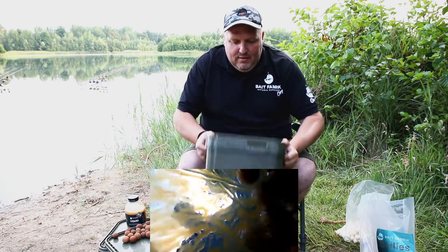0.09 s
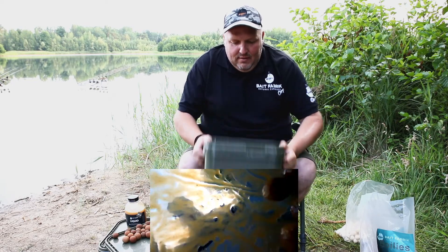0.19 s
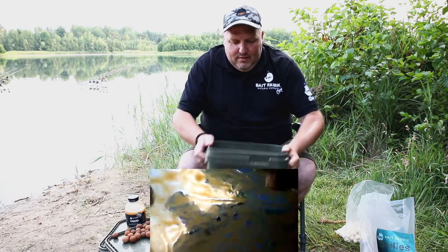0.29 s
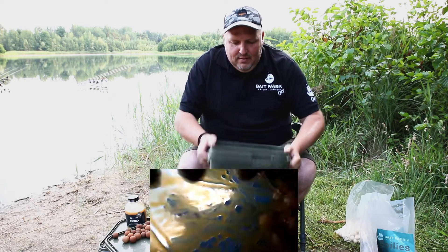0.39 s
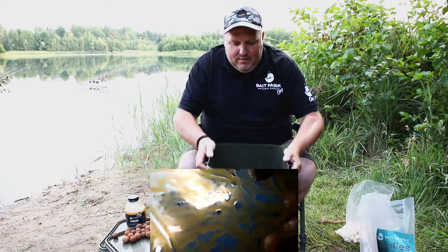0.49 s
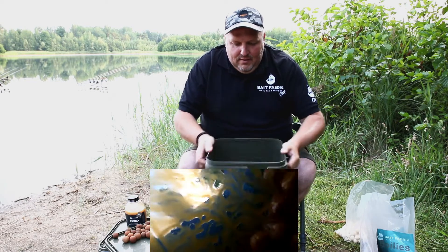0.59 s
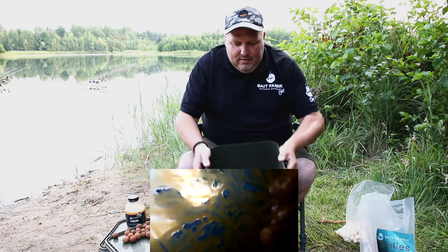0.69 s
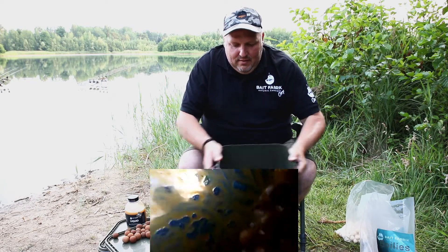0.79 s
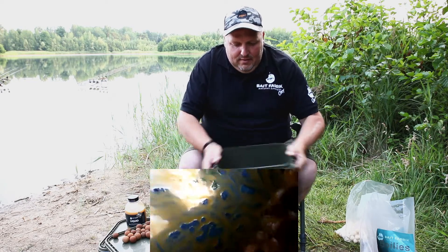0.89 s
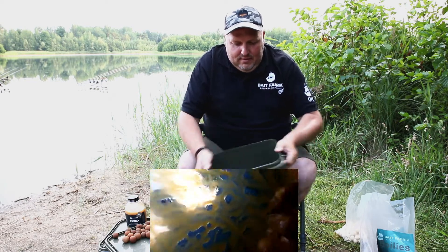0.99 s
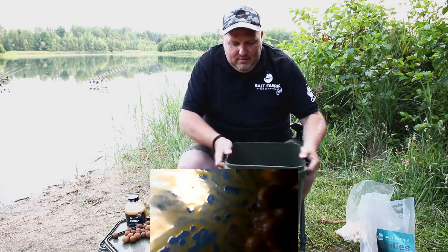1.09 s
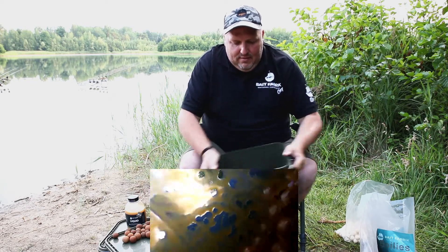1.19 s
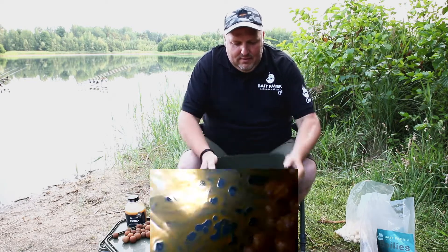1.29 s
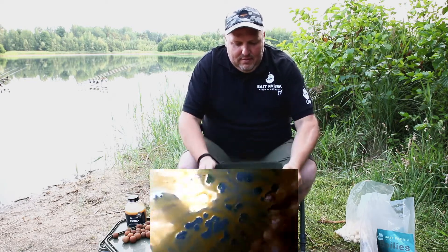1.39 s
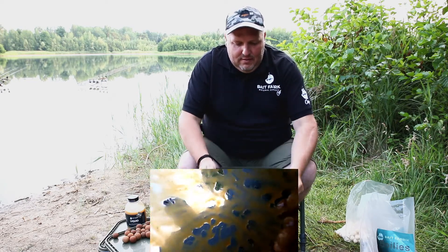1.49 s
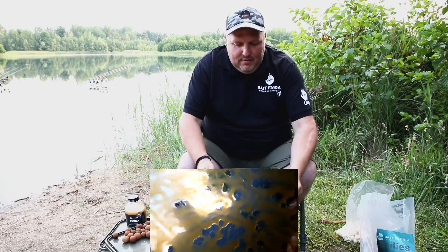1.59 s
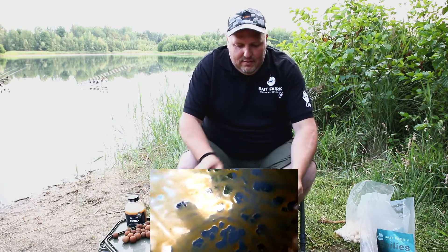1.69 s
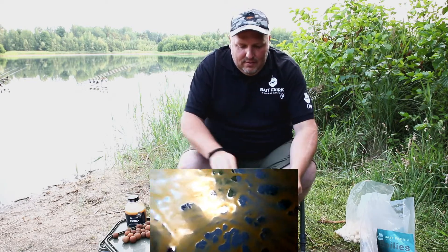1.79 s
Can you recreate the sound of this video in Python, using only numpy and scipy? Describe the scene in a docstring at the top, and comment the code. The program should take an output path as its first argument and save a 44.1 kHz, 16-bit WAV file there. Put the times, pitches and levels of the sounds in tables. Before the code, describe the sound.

Close, dry outdoor sound of a plastic tub tilted by hand: baits clatter hollowly twice, thin to single knocks, the rim clacks, more knocks tumble, then a dull thud and brief handling scuff.

```python
"""Hard baits rolling in a plastic tub

Outdoors, one microphone close to the tub, no echo; the air behind is very quiet, with a faint whine.
Round baits roll from side to side: two dense surges of small impacts, then knocks in ones and twos.
The stiff rim clacks in the hands, the tub is put down with a thud and handled once more.
Hits are sums of damped modes and short noise bursts; sliding, sleeves and air are coloured noise."""
import sys
import numpy as np
from scipy import signal
from scipy.fft import rfft, irfft
from scipy.io import wavfile
from scipy.ndimage import uniform_filter1d

SR = 44100
rng = np.random.default_rng(int(sys.argv[2]) if len(sys.argv) > 2 else 0)


def master_out(mix):
    """Clip the mix to full scale and print it as 16-bit PCM to the path in sys.argv[1]."""
    frames = np.transpose(np.atleast_2d(mix))
    ceiling = np.clip(frames, -1, 1)
    pcm = np.round(ceiling * 32767).astype(np.int16)
    wavfile.write(sys.argv[1], SR, pcm)


N = 79380
RING_S = 0.16  # length computed for each hit


def amp(db):
    """Decibels to gain."""
    return 10 ** (np.asarray(db) / 20)


def unit(hit):
    """Scale a hit so that its energy equals that of 10 ms at level 1."""
    return hit / np.sqrt(np.sum(hit ** 2) / (0.01 * SR))


def low_cut(x, hz):
    """Remove the bass below a corner."""
    return signal.sosfilt(signal.butter(2, hz, "high", fs=SR, output="sos"), x)


def noise(spectrum, size):
    """Noise of level 1, coloured by a spectrum drawn straight over log frequency."""
    hz, db = np.array(spectrum, float).T
    freqs = np.maximum(np.fft.rfftfreq(size, 1 / SR), 1)
    gain = amp(np.interp(np.log(freqs), np.log(hz), db))
    coloured = irfft(rfft(rng.standard_normal(size)) * gain, size)
    return coloured / coloured.std()


def decay(t60):
    """A fall of 60 dB in t60 seconds."""
    return np.exp(-np.log(1000) * np.arange(int(RING_S * SR)) / SR / t60)


SPOT_SCATTER_DB, SPOT_DETUNE = 2.5, 0.0085  # spread of mode level, and of pitch as a share of it


def ring(modes):
    """Damped modes; every strike spot weights and detunes them a little differently."""
    t = np.arange(int(RING_S * SR)) / SR
    total = np.zeros(len(t))
    for hz, db, t60 in modes:
        sign_draw, level_draw, pitch_draw = rng.standard_normal(3)
        gain = np.sign(sign_draw) * amp(db + SPOT_SCATTER_DB * level_draw)
        pitch_hz = hz * (1 + SPOT_DETUNE * pitch_draw)
        total += gain * np.sin(2 * np.pi * pitch_hz * t) * decay(t60)
    return unit(total)


def burst(spectrum, t60):
    """Many close modes that die together, as decaying noise."""
    return unit(noise(spectrum, int(RING_S * SR)) * decay(t60))


def add(out, start_s, hit):
    """Mix a hit in at its time."""
    i = max(int(start_s * SR), 0)
    out[i:i + len(hit)] += hit[:N - i]


# Still outdoor air behind the tub: freq_hz, level_db (relative, per Hz)
AIR_SPECTRUM = [(25, -23), (50, 2), (85, -3), (170, 4), (280, -9), (600, -21.5), (1800, -10), (4500, -25.5),
                (10500, -26.5), (15500, -28)]
AIR_DB, WHINE_HZ, WHINE_DB = -55.5, 9994, -76


def air():
    """Still outdoor air as coloured noise, with a faint steady-pitched whine that wavers in level."""
    waver = uniform_filter1d(rng.standard_normal(N), size=1500)
    waver_gain = amp(2 * waver / waver.std())  # 2 dB spread
    tone = np.sqrt(2) * np.sin(2 * np.pi * WHINE_HZ * np.arange(N) / SR)
    return amp(AIR_DB) * noise(AIR_SPECTRUM, N) + amp(WHINE_DB) * waver_gain * tone


def rub(strokes, spectrum, grain_db):
    """Grainy friction: coloured noise that swells and stops with each stroke."""
    t = np.arange(N) / SR
    level = np.zeros(N)
    for peak_s, rise_s, fall_s, db in strokes:
        level += amp(db) * np.interp(t, [peak_s - rise_s, peak_s, peak_s + fall_s], [0, 1, 0])
    grain = uniform_filter1d(rng.standard_normal(N), size=130)
    return level * amp(grain_db * grain / grain.std()) * noise(spectrum, N)


# Sleeves brushing as the arms move: peak_s, rise_s, fall_s, level_db
SLEEVE_STROKES = [(.93, 0.15, 0.14, -67), (1.10, 0.13, 0.21, -62.5), (1.47, 0.17, 0.13, -64.5),
                  (1.63, 0.015, 0.012, -59.5)]
# Colour of the cloth: freq_hz, level_db (relative, per Hz)
SLEEVE_SPECTRUM = [(1500, -11), (3500, -7), (6000, 1), (10500, 11), (15500, -5)]


def sleeves():
    """Sleeves brushing: bright friction with almost no grain."""
    return rub(SLEEVE_STROKES, SLEEVE_SPECTRUM, grain_db=0.5)


# Hands and the tub's underside sliding on each other and on the support:
# peak_s, rise_s, fall_s, level_db
SLIDE_STROKES = [(.905, 0.052, 0.068, -47.5), (1.085, 0.19, 0.14, -43), (1.522, 0.021, 0.048, -39.5),
                 (1.661, 0.055, 0.072, -44)]
# Colour of the sliding: freq_hz, level_db (relative, per Hz)
SLIDE_SPECTRUM = [(120, -2), (300, 13.5), (900, 3), (2500, -4), (4500, -20), (10000, -26), (15500, -42)]


def slides():
    """Sliding contact on the tub: low, grainy friction."""
    return rub(SLIDE_STROKES, SLIDE_SPECTRUM, grain_db=3.5)


# Modes of the whole loaded tub on its support: pitch_hz, level_db (relative), t60_s
BASE_MODES = [(122.7, -1, 0.079), (180, -1, 0.049), (232.8, 3.5, 0.087), (307, -4.5, 0.065)]
# The tub landing and settling: start_s, level_db
THUDS_AT = [(1.502, -23), (1.521, -26), (1.534, -27), (1.556, -33)]
BASE_LOW_HZ = 119  # the whole tub radiates little below this


def thuds():
    """The tub is put down and rocks to rest; each contact rings the loaded tub's low modes."""
    out = np.zeros(N)
    for start_s, db in THUDS_AT:
        add(out, start_s, amp(db) * unit(low_cut(ring(BASE_MODES), BASE_LOW_HZ)))
    return out


# Modes of the stiff rim: pitch_hz, level_db (relative), t60_s
RIM_MODES = [(565, 8, 0.016), (997, 5, 0.029), (1345, -2.5, 0.042), (1450, -3.5, 0.032), (1576, 3, 0.044),
             (1743, 0, 0.027), (2312, -5.5, 0.044), (2446, 0, 0.029), (2835, -6.5, 0.035),
             (3262, -9, 0.033), (4550, -11.5, 0.028), (10660, -16, 0.021)]
# Crack of a hard contact: freq_hz, level_db (relative, per Hz)
CRACK_SPECTRUM = [(300, -21.5), (1500, 7), (2800, 5.5), (4500, -8.5), (7000, -11.5), (10500, -8.5),
                  (12500, -19.5), (15500, -53)]
# Sharp plastic clacks: start_s, ring_level_db, lead_pitch_hz, crack_level_db (before the build-up)
CLACKS_AT = [(.103, -39, 1511, -51), (.134, -50, 1980, -50.5), (0.276, -33.5, 1450, -45),
             (.297, -42, 2340, -48), (0.315, -31, 1670, -42), (0.471, -36, 2333, -50),
             (0.493, -41, 1500, -50), (.504, -33, 1450, -54), (0.545, -49, 2340, -50),
             (.578, -32.5, 1025, -72), (.587, -35.5, 2320, -38.5), (.644, -42, 1497, -53),
             (0.708, -44, 1600, -48.5), (.727, -41, 1574, -48), (.840, -48, 1664, -47.5),
             (.917, -32.5, 1406, -41), (0.918, -37, 3340, -64), (.977, -31.5, 1470, -53),
             (1, -44, 2200, -45), (1.01, -25.5, 1724, -34.5), (1.013, -23.5, 2476, -32.5),
             (1.098, -40, 1950, -45.5), (1.128, -32, 1300, -49.5), (1.244, -37, 1810, -54),
             (1.302, -44.5, 1560, -55), (1.503, -34, 1503, -33.5), (1.505, -37.5, 2760, -55),
             (1.521, -32.5, 1208, -48.5), (1.54, -46.5, 1920, -61), (1.654, -61, 2280, -42.5),
             (1.658, -37.5, 3280, -46), (1.66, -33.5, 920, -38), (1.694, -40, 2430, -63),
             (1.696, -43, 1504, -58.5)]
CRACK_T60_S, LEAD_MODE_BOOST_DB = 0.029, 17
CLACK_RISE_S = 0.0014  # build-up, to within 60 dB of full


def clacks():
    """Hard contacts crack and ring the rim; one mode leads, bent by the grip to the clack's own pitch."""
    out = np.zeros(N)
    for start_s, ring_db, lead_hz, crack_db in CLACKS_AT:
        nearest_hz = min(RIM_MODES, key=lambda mode: abs(mode[0] - lead_hz))[0]
        modes = [(lead_hz, db + LEAD_MODE_BOOST_DB, t60) if hz == nearest_hz else (hz, db, t60)
                 for hz, db, t60 in RIM_MODES]
        rim_ring = amp(ring_db) * ring(modes)
        crack = amp(crack_db) * burst(CRACK_SPECTRUM, CRACK_T60_S)
        add(out, start_s, (rim_ring + crack) * (1 - decay(CLACK_RISE_S)))
    return out


# Modes of the tub's floor and walls: pitch_hz, level_db (relative), t60_s
TUB_MODES = [(269.4, -3.5, 0.12), (300.3, 1, 0.099), (409.7, -2.5, 0.049), (480, -1.5, 0.043),
             (556.5, 2, 0.055), (630, -0.5, 0.057), (698, -7.5, 0.058), (908, 1, 0.018), (1000, 1.5, 0.027),
             (1225, -11.5, 0.04), (1562, -7.5, 0.035), (1735, -17, 0.031), (2434, -10.5, 0.046)]
# The tub's dense short-lived modes: freq_hz, level_db (relative, per Hz)
WASH_SPECTRUM = [(40, -45.5), (90, -8.5), (200, -8.5), (380, -12), (650, -4), (1300, -6.5), (2400, -10.5),
                 (4000, -19), (9000, -23.5), (15000, -16.5)]
WASH_DB, WASH_T60_S = -4.5, 0.037
TUB_LOW_HZ = 188  # an open tub radiates little bass


def tub_spot(modes):
    """The tub's answer to a tap at one spot: clear modes over a wash of dense ones."""
    clear = unit(low_cut(ring(modes), TUB_LOW_HZ))
    return clear + amp(WASH_DB) * burst(WASH_SPECTRUM, WASH_T60_S)


LOW_CUT_SHARE = 0.18  # low cut as a share of the corner: brighter knocks also sound thinner


def mode_band(x, corner_hz):
    """A knock is a band of tub modes, from a low cut up to its corner."""
    corner_hz = min(corner_hz, SR / 4)
    dulled = signal.sosfilt(signal.butter(2, corner_hz, fs=SR, output="sos"), x)
    return low_cut(dulled, LOW_CUT_SHARE * corner_hz)


# The mass of baits tumbling, level joined by straight lines: time_s, level_db
TUMBLE_LEVEL = [(0, -35), (.12, -49.5), (.203, -35.5), (0.238, -21.5), (0.275, -20.5), (0.326, -23),
                (0.365, -38), (0.426, -34.5), (.458, -25), (0.509, -25.5), (.555, -35), (.615, -50),
                (0.71, -35), (0.798, -49), (.89, -50), (.97, -32.5), (1.05, -47), (1.151, -31), (1.21, -37),
                (1.308, -38.5), (1.34, -43), (1.47, -56.5)]
TUMBLE_PER_S, TUMBLE_CORNER_HZ = 750, 1450  # mean impact rate; corner of the hard impacts
HARDNESS_DB_PER_DB = 0.32  # how fast the hard share falls with the level
SOFT_SHARE = 0.27  # slowly rolling baits land duller, at this share of the tumble's corner
HIT_SCATTER_DB = 2.93


def tumble(spots=16):
    """A shower of small impacts on many spots; the faster the baits move, the harder they hit."""
    times_s, db = np.array(TUMBLE_LEVEL).T
    level_db = np.interp(np.arange(N) / SR, times_s, db)
    hardness = amp(HARDNESS_DB_PER_DB * (level_db - db.max()))  # 1 at the loudest
    size = amp(level_db + HIT_SCATTER_DB * rng.standard_normal(N))
    out = np.zeros(N)
    for _ in range(spots):
        hits = size * (rng.random(N) < TUMBLE_PER_S / spots / SR)
        spot = tub_spot(TUB_MODES)
        hard = unit(mode_band(spot, TUMBLE_CORNER_HZ))
        soft = unit(mode_band(spot, TUMBLE_CORNER_HZ * SOFT_SHARE))
        out += signal.oaconvolve(hits * hardness, hard)[:N]
        out += signal.oaconvolve(hits * (1 - hardness), soft)[:N]
    return out / np.sqrt(TUMBLE_PER_S * 0.01)  # mean number of hits in 10 ms


# Single baits hitting the tub, harder contacts ringing higher: start_s, level_db, lead_pitch_hz
KNOCKS_AT = [(.001, -34, 480), (.020, -38, 410), (.075, -40, 480), (.084, -35, 286), (0.156, -37, 333),
             (0.182, -35.5, 705), (.212, -26.5, 480), (.222, -18.5, 553), (.235, -16, 970),
             (.241, -17, 580), (.247, -12, 626), (0.254, -23, 990), (0.26, -16, 720), (.269, -21, 590),
             (.275, -12.5, 1030), (0.286, -20, 900), (.296, -21, 620), (.306, -16, 1040), (.312, -15, 1000),
             (.316, -21, 390), (.341, -19, 536), (.377, -29.5, 317), (.440, -22, 600), (.453, -20, 635),
             (.466, -17.5, 980), (.475, -18.5, 530), (.492, -29.5, 556), (0.498, -18, 580),
             (0.505, -14.5, 626), (.524, -33.5, 900), (.543, -32, 480), (0.65, -33, 300),
             (0.676, -31.5, 575), (.686, -34, 480), (.709, -25.5, 547), (.727, -30.5, 940),
             (.748, -40, 800), (0.758, -35, 630), (.936, -31.5, 732), (.955, -25, 516), (0.976, -26, 900),
             (.982, -22.5, 344), (1.012, -27.5, 630), (1.095, -29.5, 1000), (1.109, -29.5, 280),
             (1.129, -14.5, 750), (1.143, -23, 1160), (1.151, -18.5, 556), (1.158, -22, 500),
             (1.193, -27, 780), (1.217, -28.5, 630), (1.225, -23, 520), (1.246, -20.5, 716),
             (1.259, -22.5, 400), (1.277, -31.5, 595), (1.291, -23.5, 570), (1.302, -26.5, 423),
             (1.317, -25.5, 520), (1.322, -27.5, 333), (1.539, -32.5, 910)]
LEAD_DB, LEAD_OCT = 7, 0.26  # boost of the modes near the lead pitch, and its reach in octaves
CORNER_PER_LEAD = 1.24  # a knock dies out above this multiple of its lead pitch
KNOCK_RISE_S = 0.0014  # the ringing takes a moment to spread over the tub


def knocks():
    """Single baits strike the tub; each contact brings out its own group of modes."""
    out = np.zeros(N)
    for start_s, db, lead_hz in KNOCKS_AT:
        modes = []
        for hz, mode_db, t60 in TUB_MODES:
            octaves_away = np.log2(hz / lead_hz)
            boost_db = LEAD_DB * np.exp(-(octaves_away / LEAD_OCT) ** 2)
            modes.append((hz, mode_db + boost_db, t60))
        spread = tub_spot(modes) * (1 - decay(KNOCK_RISE_S))
        add(out, start_s, amp(db) * unit(mode_band(spread, CORNER_PER_LEAD * lead_hz)))
    return out


def scene():
    """Everything at one close microphone, with no walls to echo."""
    handling = sleeves() + slides() + thuds()
    return (air() + handling + clacks() + tumble() + knocks())[None]


MIC_LOW_HZ, TOP_HZ = 59.5, 15750  # the microphone's low cut; the recorder's upper limit


def record(dry):
    """The microphone thins the deep bass and the recorder cuts the top steeply."""
    top_cut = signal.ellip(10, 0.2, 80, TOP_HZ, fs=SR, output="sos")
    return signal.sosfilt(top_cut, low_cut(dry, MIC_LOW_HZ))


dry = scene()
out = record(dry)
master_out(out)
```